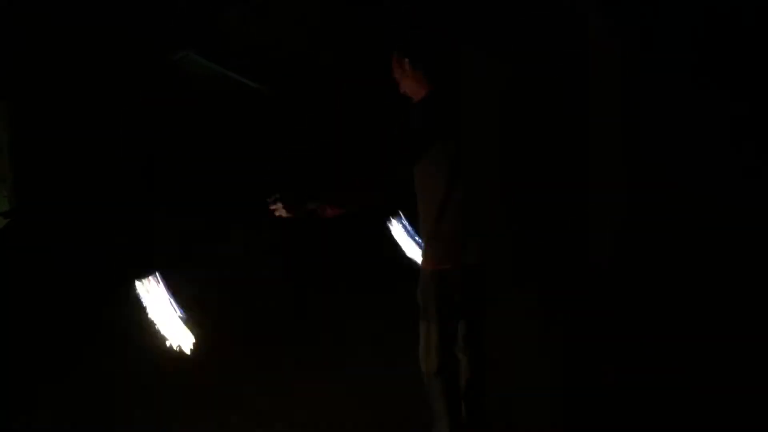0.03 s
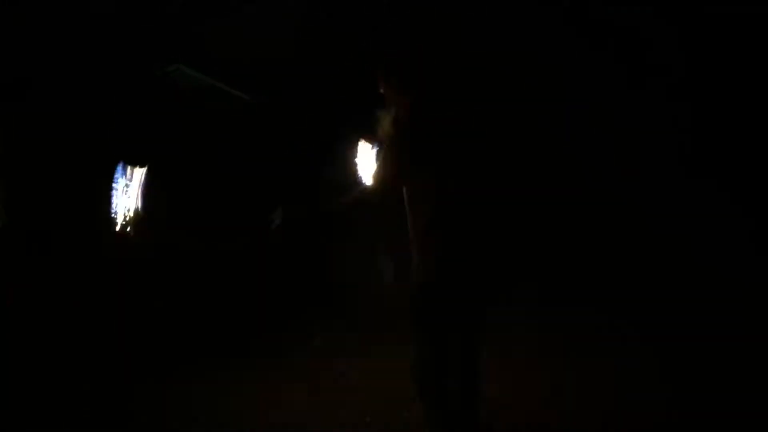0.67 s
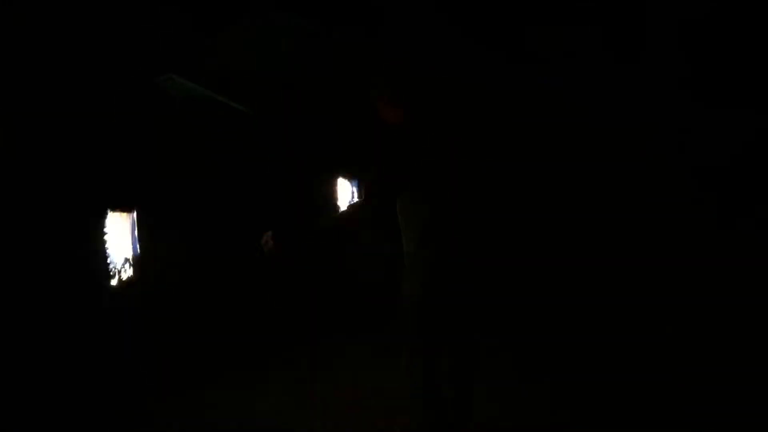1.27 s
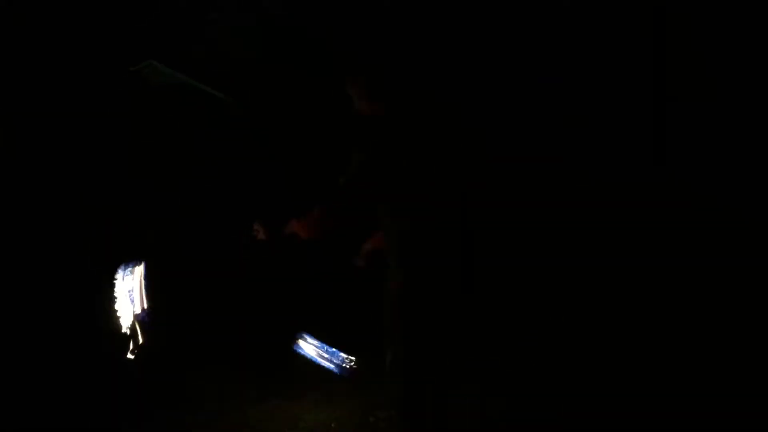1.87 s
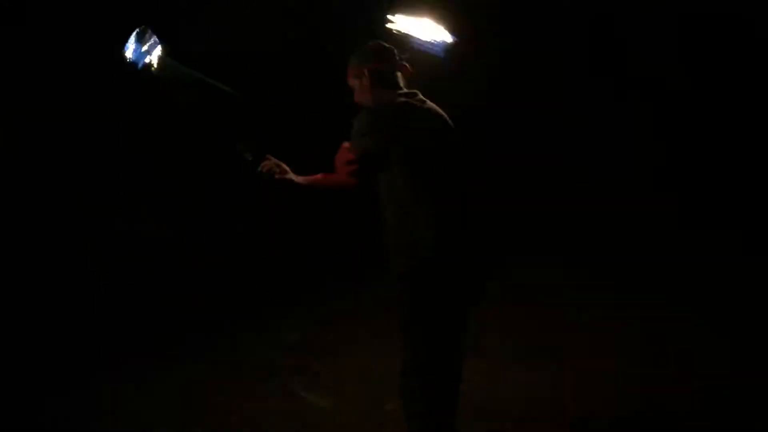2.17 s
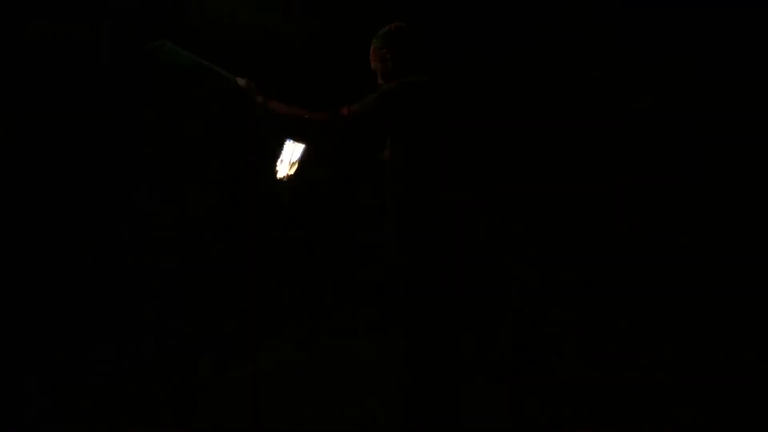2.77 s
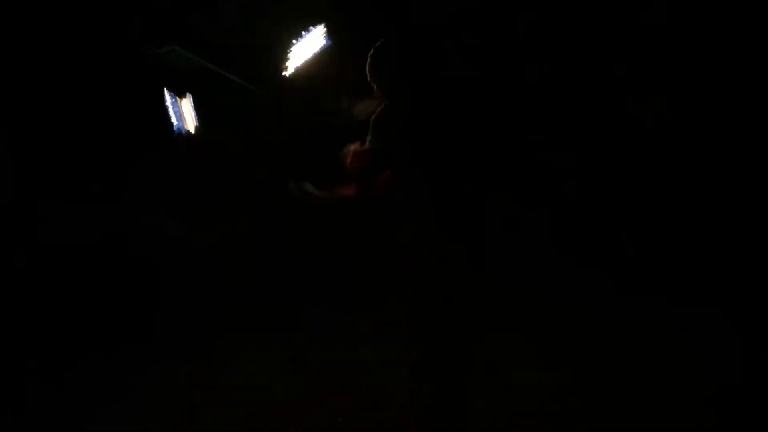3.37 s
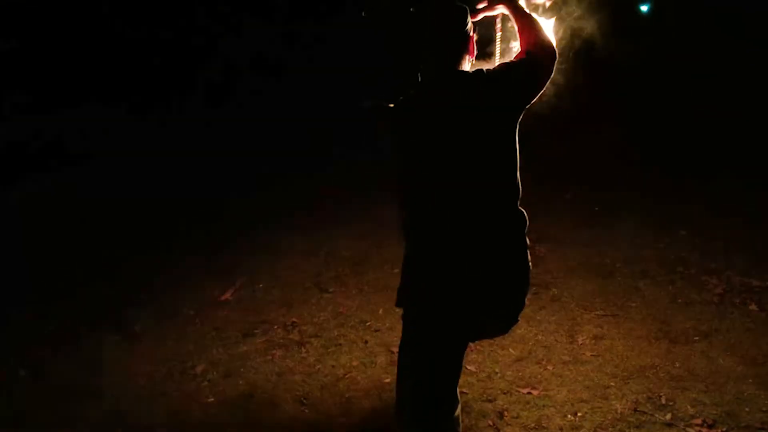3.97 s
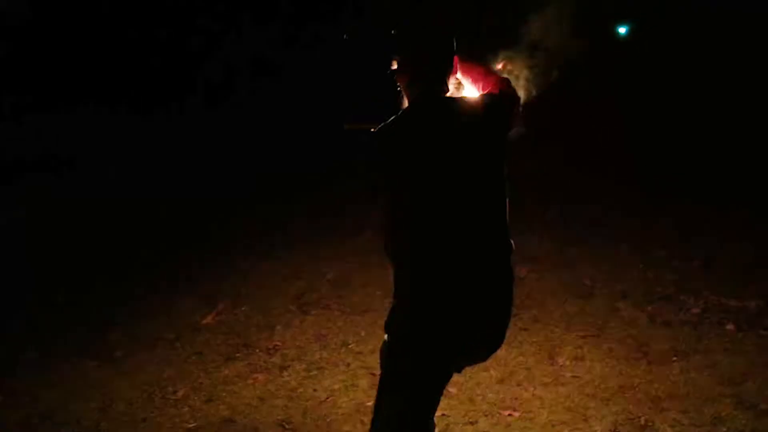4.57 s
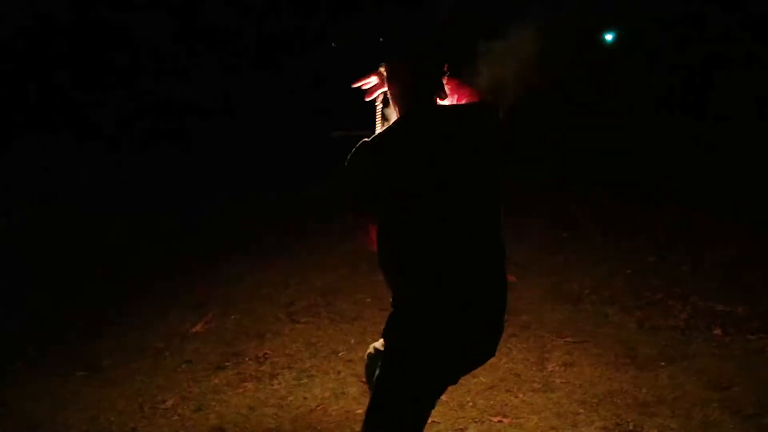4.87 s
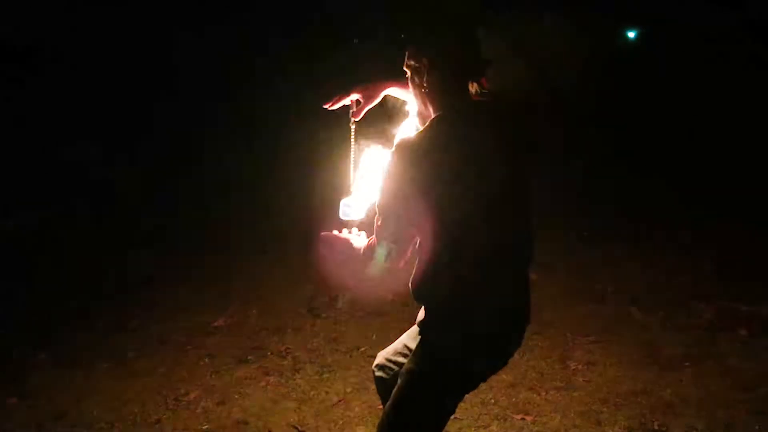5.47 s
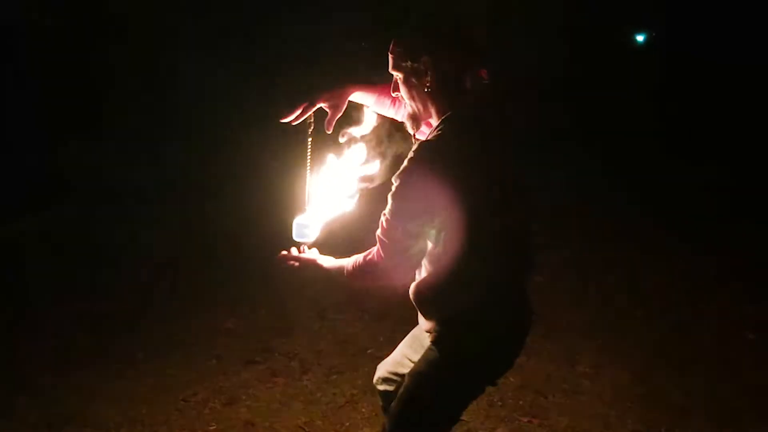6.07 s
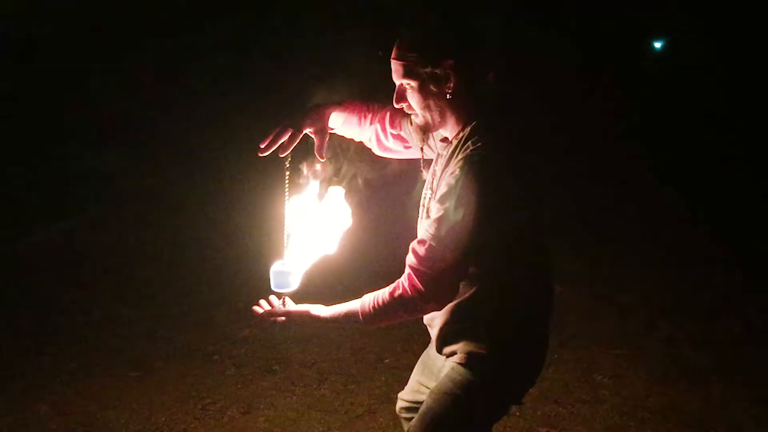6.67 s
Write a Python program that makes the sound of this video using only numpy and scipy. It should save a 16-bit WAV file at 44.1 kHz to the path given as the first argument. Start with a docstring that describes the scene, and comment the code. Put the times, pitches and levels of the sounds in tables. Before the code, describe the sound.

Two burning poi swing close by over open ground outdoors. For the first three and a half seconds, a low, turbulent roar swells about every 0.6 seconds, six turns in all, each with a hollow, sweeping whoosh, a light hiss of air and faint sizzling. Soft woofs of flame run through the turns, and short dull thumps stand out at the very start and around 2.0, 2.7 and 3.1 seconds. At about 3.5 seconds the swinging stops abruptly and everything becomes much quieter. A resting flame flutters low, with small soft flares, over a wash of distant traffic and a wavering low hum like a far engine. Around 5 seconds a faint, distant tone briefly rises and falls. A few tiny ticks of chain and wick are scattered through this quiet stretch, which lasts until the end at about 6.7 seconds.

```python
"""Two burning poi are swung in circles close by, over open ground at night. Turbulent burning rumbles and roars
on every turn, and air tearing past wick and chain rushes and hisses. The flames interfere with their echo off
the ground, a comb filter that sweeps as they rise and fall. The scene then changes abruptly to a calm flame,
far traffic, a hum, a faint gliding tone and ticks."""
import sys
import numpy as np
from scipy import signal
from scipy.fft import rfft, irfft, next_fast_len
from scipy.io import wavfile
from scipy.ndimage import uniform_filter1d

SR = 44100
rng = np.random.default_rng(int(sys.argv[2]) if len(sys.argv) > 2 else 0)


def put_to_file(sound):
    """Save the sound as 16-bit audio at rate SR, in the file named by the first command-line argument."""
    columns = np.atleast_2d(sound).T  # one column per channel
    safe = np.clip(columns, -1, 1)
    whole_steps = np.round(safe * 32767)
    wavfile.write(sys.argv[1], SR, whole_steps.astype(np.int16))


N = 296793
TIME = np.arange(N) / SR


def from_db(db):
    """Amplitude grows tenfold with every 20 dB."""
    return 10 ** (np.asarray(db) / 20)


def unit_rms(x):
    """Normalisation to a mean power of 1."""
    return x / np.sqrt(np.mean(x ** 2) + 1e-20)


def evened(x, span_s):
    """Division by the running rms holds short-time power near 1."""
    return x / np.sqrt(uniform_filter1d(x ** 2, int(span_s * SR)) + 1e-12)


def in_time(rows):
    """Linear interpolation of each column against the first, time."""
    times, *columns = np.transpose(rows)
    return [np.interp(TIME, times, column) for column in columns]


def swell(peak_s, rise_s, fall_s):
    """A Gaussian envelope of height 1 with separate rise and fall."""
    away = (TIME - peak_s) / np.where(TIME < peak_s, rise_s, fall_s)
    return np.exp(-np.minimum(away ** 2, 20))


def drift(rate_hz):
    """Low-passed noise of rms 1 gives smooth random motion."""
    size = next_fast_len(N, real=True)
    hz = np.arange(size // 2 + 1) * SR / size
    spectrum = rfft(rng.standard_normal(size)) / (1 + (hz / rate_hz) ** 2)
    return unit_rms(irfft(spectrum, size)[:N])


def flicker(depth_db, rate_hz):
    """Turbulent modulation: a log-normal gain of unit power."""
    return unit_rms(from_db(depth_db * drift(rate_hz)))


def noise(spectrum):
    """Spectral shaping of white noise, with steep skirts and an rms of 1."""
    hz = np.maximum(np.arange(N // 2 + 1) * SR / N, 1)
    points_hz, points_db = np.transpose(spectrum)
    skirts = np.minimum(1, np.minimum(hz / points_hz[0], points_hz[-1] / hz)) ** 4
    gain = from_db(np.interp(np.log(hz), np.log(points_hz), points_db)) * skirts
    return unit_rms(irfft(rfft(rng.standard_normal(N)) * gain, N))


def phase_of(hz):
    """Phase is the time integral of frequency."""
    return 2 * np.pi * np.cumsum(hz) / SR


def narrow_noise(hz, width_hz):
    """Random quadrature modulation spreads a moving tone into a band."""
    phase = phase_of(hz)
    return drift(width_hz) * np.cos(phase) + drift(width_hz) * np.sin(phase)


def resonate(x, hz, width_hz):
    """A two-pole resonance with a peak gain of 1."""
    r = np.exp(-np.pi * width_hz / SR)
    feedback = [1, -2 * r * np.cos(2 * np.pi * hz / SR), r * r]
    return signal.lfilter(np.array([1, 0, -1]) * (1 - r * r) / 2, feedback, x)


# The wash of traffic. Each row: frequency in Hz, relative density in dB.
TRAFFIC_SPECTRUM = [(150, 0.5), (300, -3), (460, -5.8), (670, -4.5), (820, -6), (1000, -6.5), (1300, -9.5),
                    (1700, -15.5), (2400, -26), (3800, -28), (5000, -31), (6200, -30.5), (10000, -35),
                    (15500, -36)]
# Its course. Each row: time in seconds, relative level in dB.
TRAFFIC_LEVEL = [(3.6, -57.5), (4.2, -58.5), (4.8, -59), (5.15, -58), (5.4, -58.5), (6.0, -58.5),
                 (6.7, -58.5)]
# Its wavering bands. Each row: centre in Hz, level in dB.
TRAFFIC_BANDS = [(560, -77), (660, -68), (730, -69.5), (810, -68.5), (900, -68), (980, -67.8), (1070, -71),
                 (1170, -74.5)]
def far_traffic(glide=.015):
    """Broadband noise and wavering narrow bands superpose into a distant wash."""
    wavers = 0
    for hz, band_db in TRAFFIC_BANDS:
        band = narrow_noise(hz * (1 + glide * drift(rate_hz=5)), width_hz=42)
        wavers += from_db(band_db) * band * flicker(depth_db=3.2, rate_hz=8)
    level_db, = in_time(TRAFFIC_LEVEL)
    wash = noise(TRAFFIC_SPECTRUM) * flicker(depth_db=.5, rate_hz=6.8)
    return wavers + from_db(level_db - 2.5) * wash


# The course of the hum. Each row: time in seconds, level in dB.
FAR_HUM_LEVEL = [(3.75, -71), (4.0, -64), (4.4, -63.5), (4.8, -70.5), (5.05, -57.5), (5.3, -66.5),
                 (5.5, -61), (6.0, -61), (6.7, -64.5)]
def far_hum(hz=144.8, waver=.012):
    """A low sinusoid, modulated in pitch and level, hums like a distant engine."""
    level_db, = in_time(FAR_HUM_LEVEL)
    tone = np.sqrt(2) * np.sin(phase_of(hz * (1 + waver * drift(rate_hz=8))))
    return from_db(level_db) * tone * flicker(depth_db=1.5, rate_hz=8)


# A rising and falling tone. Each row: time in seconds, pitch in Hz, level in dB.
TONE_GLIDE = [(4.88, 1093, -84), (4.95, 1138, -64), (5.03, 1200, -60), (5.07, 1130, -61), (5.11, 1036, -61),
              (5.16, 1010, -60), (5.22, 920, -75)]
def far_tone():
    """Spectral broadening: a long path blurs one gliding partial into a rough band."""
    hz, level_db = in_time(TONE_GLIDE)
    sounding = (TIME > TONE_GLIDE[0][0]) & (TIME < TONE_GLIDE[-1][0])
    return sounding * from_db(level_db) * evened(narrow_noise(hz, width_hz=55), span_s=.05)


# Small ticks. Each row: start in seconds, relative level in dB, centre in Hz, width in Hz,
# time to decay by 60 dB in seconds.
CHAIN_TICKS = [(3.634, -56, 2900, 900, 0.023), (3.635, -59, 9000, 9000, .015),
               (3.717, -66, 13000, 1500, .03), (4.326, -63, 7500, 3000, .015),
               (6.001, -57, 8000, 12000, 0.01), (6.115, -63, 10400, 700, 0.035),
               (6.699, -63, 9000, 9000, .025), (5.228, -70, 3450, 500, .12), (5.87, -70, 3000, 600, 0.11),
               (6.686, -65, 2980, 900, 0.12)]
def ticks():
    """Chain and wick tick in noise bursts that decay exponentially in one resonance."""
    out = np.zeros(N)
    for start_s, level_db, hz, width_hz, t60 in CHAIN_TICKS:
        ring = unit_rms(resonate(rng.standard_normal(N), hz, width_hz))
        decay = from_db(-60 * np.clip((TIME - start_s) / t60, 0, 10)) * (TIME >= start_s)
        out += from_db(level_db) * ring * decay / 2
    return out


# The resting flame. Each row: frequency in Hz, relative density in dB.
CALM_SPECTRUM = [(25, -29), (40, -4.5), (60, -1), (90, -0.5), (120, -3.5), (146, -6.5), (170, -10.5),
                 (210, -29), (300, -24), (400, -24.5)]
# It grows as it is brought to the front. Each row: time in seconds, level in dB.
CALM_COURSE = [(3.6, -57), (4.1, -57), (4.5, -57), (4.83, -57), (4.97, -54), (5.3, -56), (5.5, -54),
               (6.0, -53), (6.12, -59), (6.22, -53), (6.7, -57)]
def calm_flame():
    """Combustion noise of a flame at rest is a low flutter."""
    level_db, = in_time(CALM_COURSE)
    burning = evened(noise(CALM_SPECTRUM), span_s=.082)
    return from_db(level_db) * burning * flicker(depth_db=2, rate_hz=10)


# Woofs of flame. Each row: peak time in seconds, rise and fall in seconds, level in dB, pitch in Hz.
FLAME_FLARES = [(.04, .03, -36.5, 225), (.165, 0.044, -34, 135.3), (.58, 0.086, -42.5, 206.5),
                (.77, 0.045, -41, 95), (1.0, 0.062, -42.5, 170), (1.1, .04, -42.5, 111),
                (1.385, 0.064, -40.5, 99.9), (1.66, 0.065, -46, 200), (2.11, .03, -39, 130),
                (2.835, 0.037, -33, 144.2), (3.205, 0.039, -38.5, 250), (3.335, .035, -34.5, 170),
                (3.73, .03, -53.5, 59.1), (3.96, .025, -54, 66.3), (4.305, .025, -48, 61.9),
                (4.38, .03, -56, 54.5), (4.62, .025, -52, 60.4), (4.69, .045, -50.5, 59.2),
                (5.08, .025, -53, 65), (5.23, 0.027, -52, 64), (6.0, .03, -52, 79.8)]
def flares(waver=.16):
    """A flaring flame oscillates unevenly about one low pitch, swelling and fading."""
    wander = 1 + waver * drift(rate_hz=90.6)
    throb = np.sqrt(2) * flicker(depth_db=2.5, rate_hz=92)
    return throb * sum(from_db(db) * swell(s, span_s, span_s) * np.sin(phase_of(hz * wander))
                       for s, span_s, db, hz in FLAME_FLARES)


# The flame tears off and catches again. Each row: start in seconds, envelope peak in dB, pitch in Hz.
VAPOUR_PUFFS = [(.046, -27.5, 258), (1.9991, -22, 140), (2.039, -25, 127), (2.056, -24.5, 117),
                (2.68, -29, 190), (3.1, -26, 200), (3.157, -21.5, 183)]
def puffs(decay_cycles=1.16):
    """Each puff of vapour is a heavily damped oscillation, a thump of a cycle or two."""
    out = np.zeros(N)
    for start_s, peak_db, hz in VAPOUR_PUFFS:
        cycles = np.maximum(TIME - start_s, 0) * hz
        decay = np.exp(-np.minimum(cycles / decay_cycles, 10) ** 2)
        out += from_db(peak_db) * np.sin(2 * np.pi * cycles) * decay
    return out


# Sizzles on the climbing wicks. Each row: peak time in seconds, rise and fall in seconds,
# relative level in dB.
FUEL_SIZZLES = [(.3, 0.27, -68), (.63, 0.053, -68), (.85, 0.23, -72), (1.42, 0.25, -71), (2.25, .08, -69),
                (2.65, 0.22, -76), (3.02, .1, -70), (3.47, 0.068, -70)]
# Their spectrum. Each row: frequency in Hz, relative density in dB.
SIZZLE_SPECTRUM = [(4700, 1), (5300, 3), (6000, -2), (6800, -19)]
def fuel_sizzle():
    """Sizzling fuel radiates a high band of amplitude-modulated noise."""
    envelope = sum(from_db(db) * swell(s, span_s, span_s) for s, span_s, db in FUEL_SIZZLES)
    return envelope * noise(SIZZLE_SPECTRUM) * flicker(depth_db=2.7, rate_hz=14)


# The turns. Each row: time of the fastest downswing in seconds, length as a ratio, relative levels
# of roar, rush, hiss, crest and billow in dB, clearness of the echo from 0 to 1.
POI_TURNS = [(.05, 1.0, -41, -57, -62, -51, -37, 0.9), (0.623, 1.0, -41.5, -58.7, -65, -53, -38.5, 0.95),
             (1.245, .96, -42, -59, -69.5, -52, -40, 0.93),
             (1.875, 1.05, -42.5, -58, -68, -55.5, -37.5, 0.75),
             (2.62, 1.35, -48.5, -66, -71, -66, -43.5, 0.32),
             (3.205, .88, -41, -55.5, -61.5, -61, -38.5, 0.7)]
TURN_S, TURN_LENGTH, ROAR_DB, RUSH_DB, HISS_DB, CREST_DB, BILLOW_DB, CLEARNESS = np.transpose(POI_TURNS)
# Brief swishes. Each row: peak time in seconds, rise and fall in seconds, relative levels of roar,
# rush and hiss in dB.
POI_SWISHES = [(.07, 0.029, -57, -56, -61), (.33, 0.12, -57, -68, -74.5), (.56, 0.035, -48, -69, -75),
               (1.106, 0.042, -48, -60, -65), (1.715, 0.031, -50, -66, -71), (1.83, .025, -46, -66, -73),
               (2.13, 0.13, -48.5, -62.5, -77), (2.268, .035, -61, -66, -68),
               (2.415, 0.053, -67, -66.5, -71), (2.527, 0.035, -57, -60, -65),
               (2.676, .009, -42.5, -66, -74), (2.72, 0.058, -46, -65.5, -76), (2.94, .02, -49, -71, -83),
               (3.17, 0.072, -45.5, -56, -61), (3.309, 0.042, -58, -60, -67.5),
               (3.405, 0.02, -47.5, -60.5, -73), (3.465, 0.05, -43, -64, -75)]
SWISH_S, SWISH_SPAN_S, SWISH_ROAR_DB, SWISH_RUSH_DB, SWISH_HISS_DB = np.transpose(POI_SWISHES)
def turning(peaks_db, shape, swishes_db=()):
    """Incoherent addition: turns, swishes and a steady floor sum in power to one envelope."""
    delay_s, rise_s, fall_s, floor_db = shape
    power = from_db(floor_db) ** 2
    for s, length, peak_db in zip(TURN_S, TURN_LENGTH, peaks_db):
        power += (from_db(peak_db) * swell(s + delay_s * length, rise_s * length, fall_s * length)) ** 2
    for s, span_s, peak_db in zip(SWISH_S, SWISH_SPAN_S, swishes_db):
        power += (from_db(peak_db) * swell(s, span_s, span_s)) ** 2
    return np.sqrt(power)


# Tops and bottoms of the circle. Each row: time in seconds, lag of the ground echo in milliseconds.
SWING_EXTREMES = [(-.12, 5.0), (.195, 1.55), (.49, 4.95), (.745, 1.55), (1.07, 5.1), (1.345, 1.33),
                  (1.69, 5.05), (2.025, .95), (2.42, 4.7), (2.8, 1.4), (3.07, 5.4), (3.37, .75),
                  (3.64, 4.2)]
def echo_lag_ms():
    """The path difference to the ground echo grows and shrinks with the height of the wicks."""
    times, lags = np.transpose(SWING_EXTREMES)
    steps = np.arange(len(times))
    half_turns = np.interp(TIME, times, steps)
    eased = np.floor(half_turns) + np.sin(np.pi / 2 * (half_turns % 1)) ** 2
    return np.interp(eased, steps, lags)


def over_ground(direct, lag_ms, climbing, cutoff_hz=3800):
    """Interference with a duller ground echo makes a comb, deepest at the foot of the swing."""
    reflection = np.interp(lag_ms, [2, 3.5], [.92, .5])   # wicks low, wicks high
    clearness = np.interp(TIME, TURN_S, CLEARNESS)
    share = reflection * clearness * (1 - .3 * climbing)
    dull = signal.lfilter(*signal.butter(1, cutoff_hz, fs=SR), direct)
    echo = np.interp(TIME - lag_ms / 1000, TIME, dull)
    return unit_rms(direct + share * echo)


# Spectra of the passing air. Each row: frequency in Hz, relative density in dB.
RUSH_SPECTRUM = [(2400, -22), (2850, -17), (3100, 0), (3600, 1), (4400, -2), (4950, -10), (5400, -11),
                 (6300, -18), (8000, -32)]
HISS_SPECTRUM = [(3500, -10.5), (5500, -9.5), (6800, -6.5), (7700, -9.5), (8600, -7.5), (9700, -11),
                 (10400, -17), (11300, -13), (13000, -14.5), (15700, -17)]
# Swells as the wick gathers speed. Each lists delay, rise and fall in seconds for a turn of
# length 1, then the relative floor in dB.
RUSH_SHAPE = (0, 0.16, 0.1646, -72)
HISS_SHAPE = (0, 0.18, 0.08, -75)
def passing_air():
    """Aerodynamic noise: air tearing past wick and chain rushes and hisses on each turn."""
    rush = turning(RUSH_DB, RUSH_SHAPE, SWISH_RUSH_DB) * noise(RUSH_SPECTRUM)
    rush *= flicker(depth_db=1.05, rate_hz=170)
    hiss = turning(HISS_DB, HISS_SHAPE, SWISH_HISS_DB) * noise(HISS_SPECTRUM)
    return rush + from_db(1.5) * hiss


def tearing(rips_per_s=70, rise_s=.002, jump=.7):
    """Shreds of flame rip away as a Poisson process, each a slight rounded surge in gain."""
    rips = (rng.random(N) < rips_per_s / SR) * rng.random(N) + 1e-18
    r = np.exp(-1 / (rise_s * SR))
    surges = signal.lfilter([np.e * (1 - r)], [1, -2 * r, r * r], rips)
    return unit_rms(1 + jump * surges)


# Spectra of the swung flame. Each row: frequency in Hz, relative density in dB.
RUMBLE_SPECTRUM = [(25, -30), (38, -20), (55, -5), (75, 0), (120, -1), (195, 1.5), (280, -5), (400, -10),
                   (600, -32.5)]
ROAR_SPECTRUM = [(150, -15.5), (290, -3.5), (420, 0.5), (620, -0.5), (800, -4.5), (1200, -7.5), (1600, -11),
                 (2050, -15), (2300, -19.5), (2550, -25.5), (2800, -29)]
WHOOSH_SPECTRUM = [(230, -9), (300, 0), (400, 15), (470, -9), (600, -24)]
CREST_SPECTRUM = [(1300, -1), (1700, 2.5), (2000, 4.5), (2250, 1.2), (2600, -4.5), (2850, -6), (3150, -23)]
# Their swells. Each lists delay, rise and fall in seconds for a turn of length 1, then the
# relative floor in dB.
BILLOW_SHAPE = (-0.4, 0.22, 0.13, -40)   # the flame billows out behind the wick
ROAR_SHAPE = (0.0, 0.2445, 0.28, -46.5)   # it burns hardest
WHOOSH_SHAPE = (.015, 0.3, 0.2, -78)   # the downswing drives it through the air
CREST_SHAPE = (0.07, .09, 0.115, -79)   # the roar reaches highest near the ground
# The loudest spot wanders within the flame. Each row: echo lag and its spread, both in milliseconds.
LAG_WANDER = [(1.7, .07), (3, .21)]
def combustion(roar_loss_db, full_climb_ms_per_s=12.4):
    """Turbulent burning radiates four bands of noise, each combed by its ground reflection."""
    lag_ms = echo_lag_ms()
    lag_ms_per_s = np.gradient(uniform_filter1d(lag_ms, size=3000)) * SR
    climbing = np.clip(lag_ms_per_s / full_climb_ms_per_s, 0, 1)
    ragged_ms = lag_ms + np.interp(lag_ms, *np.transpose(LAG_WANDER)) * drift(rate_hz=23)
    rumble = evened(over_ground(noise(RUMBLE_SPECTRUM), ragged_ms, climbing), span_s=.0444)
    rumble *= turning(BILLOW_DB, BILLOW_SHAPE)
    roar = evened(over_ground(noise(ROAR_SPECTRUM), ragged_ms, climbing), span_s=.06)
    roar *= turning(ROAR_DB, ROAR_SHAPE, SWISH_ROAR_DB) * from_db(1.87 - roar_loss_db)
    whoosh = over_ground(evened(noise(WHOOSH_SPECTRUM), span_s=.029), ragged_ms, climbing)
    whoosh *= turning(ROAR_DB, WHOOSH_SHAPE) * from_db(-7)
    crest = over_ground(noise(CREST_SPECTRUM), lag_ms, climbing)
    crest *= turning(CREST_DB, CREST_SHAPE)
    return rumble + whoosh + tearing() * (roar + crest)


# The wicks slow for a moment. Each row: time in seconds, fall and rise in seconds, loss of treble
# in dB, loss of roar in dB. A negative loss is a gain.
WICK_STALLS = [(.43, 0.02, -0.5, 0.5), (1.0, 0.034, -1.5, 1.5), (1.5, .045, 1.5, 1.8),
               (1.63, 0.048, -0.5, 2), (2.04, 0.03, 4, 2.5), (2.325, 0.027, 2, -0.5),
               (2.845, 0.051, 4, 1.5), (3.365, 0.024, 3, 1)]
def swung_poi():
    """Uneven airflow modulates the treble, and shared eddies modulate the whole flame."""
    treble_loss_db, roar_loss_db = sum(np.outer(losses, swell(s, span_s, span_s))
                                       for s, span_s, *losses in WICK_STALLS)
    flames = combustion(roar_loss_db)
    treble = passing_air() + fuel_sizzle()
    airflow = from_db(-treble_loss_db) * flicker(depth_db=1.16, rate_hz=16)
    eddies = flicker(depth_db=.44, rate_hz=146)
    return eddies * (flames + airflow * treble)


def scene(stop_s=3.537, fade_s=.004):
    """Superposition: the swinging gives way abruptly to the quiet, with flares and puffs on top."""
    stopped = np.clip((TIME - stop_s) / fade_s + .5, 0, 1)
    swinging = swung_poi()
    quiet = far_traffic() + far_hum() + far_tone() + ticks() + calm_flame()
    return ((1 - stopped) * swinging + stopped * quiet + flares() + puffs())[None]


def record(dry, low_hz=37, high_hz=15700):
    """Band limiting: the microphone loses the deepest bass and falls steeply at the top."""
    thinned = signal.sosfilt(signal.butter(6, low_hz, "high", fs=SR, output="sos"), dry)
    return signal.sosfilt(signal.ellip(12, .1, 80, high_hz, fs=SR, output="sos"), thinned)


dry = scene()
out = record(dry)
put_to_file(out)
```